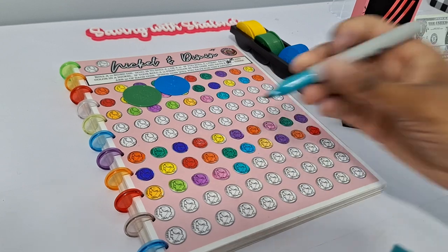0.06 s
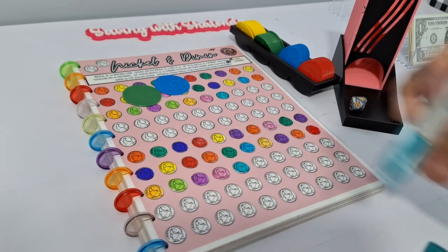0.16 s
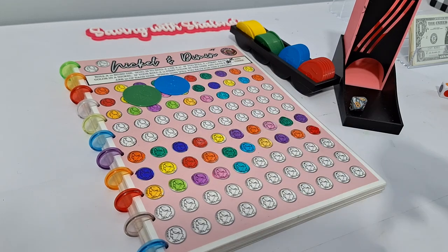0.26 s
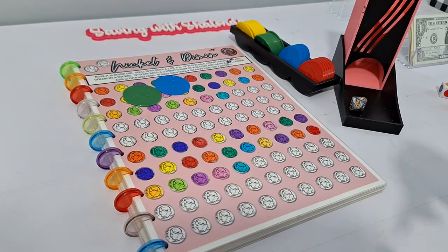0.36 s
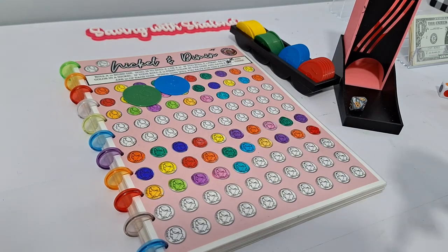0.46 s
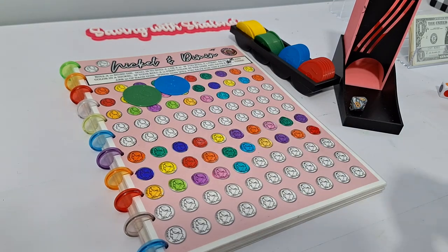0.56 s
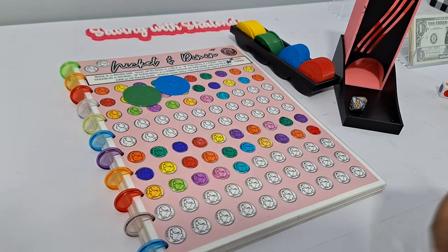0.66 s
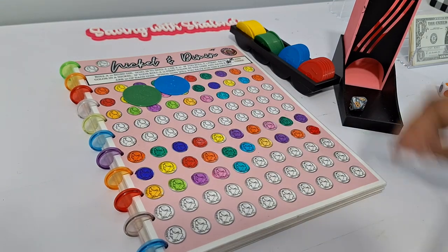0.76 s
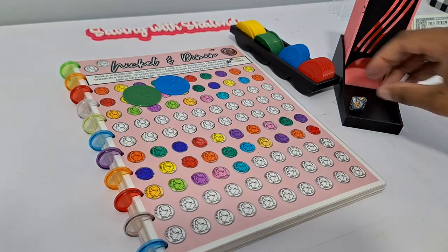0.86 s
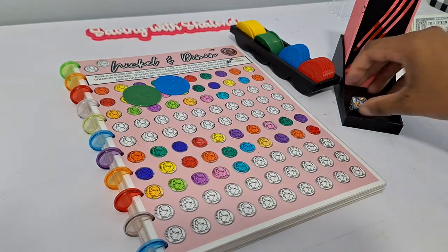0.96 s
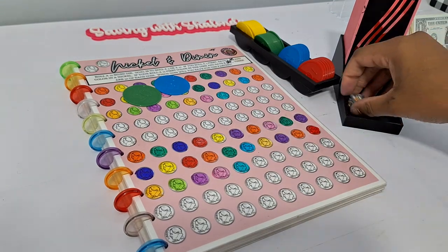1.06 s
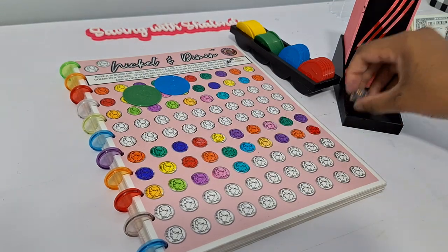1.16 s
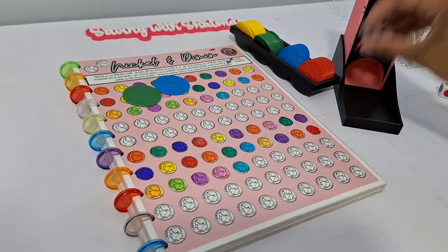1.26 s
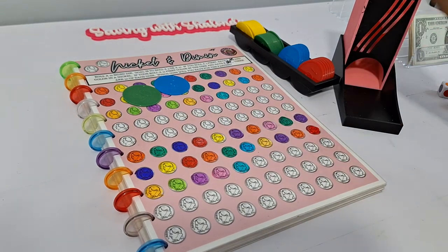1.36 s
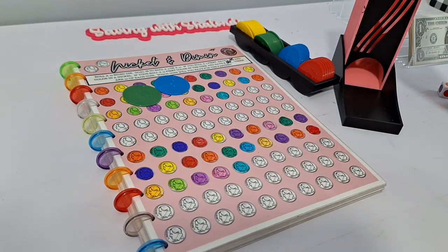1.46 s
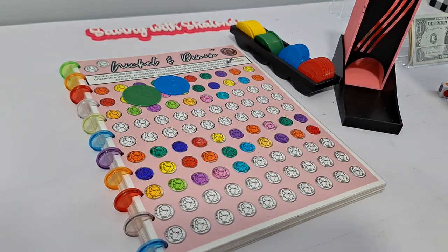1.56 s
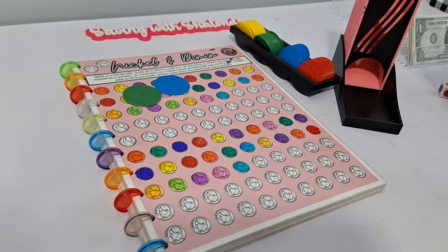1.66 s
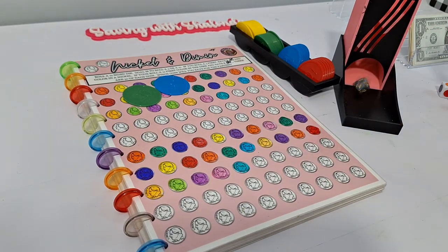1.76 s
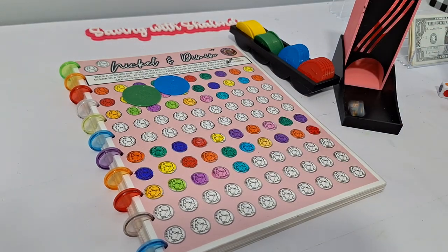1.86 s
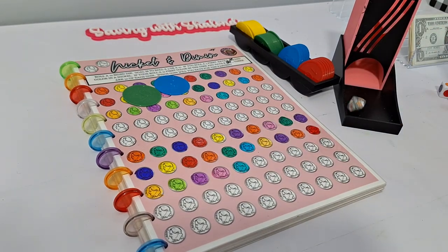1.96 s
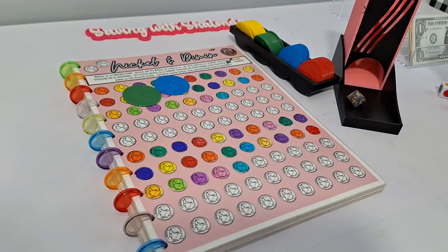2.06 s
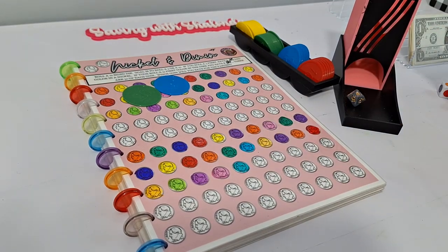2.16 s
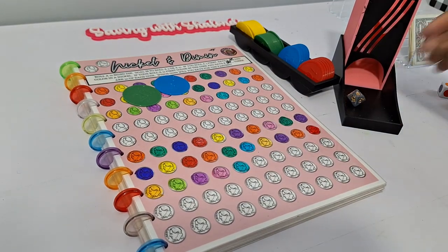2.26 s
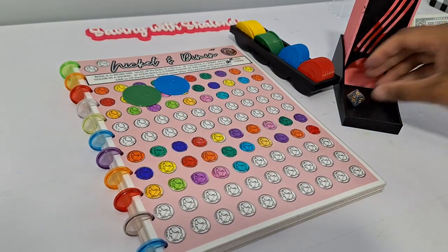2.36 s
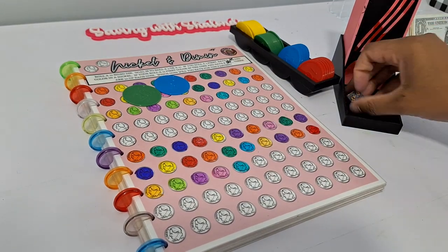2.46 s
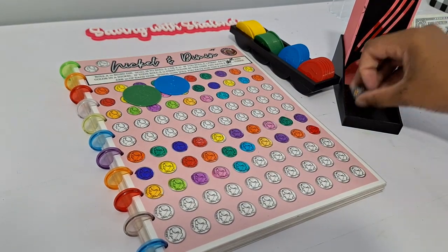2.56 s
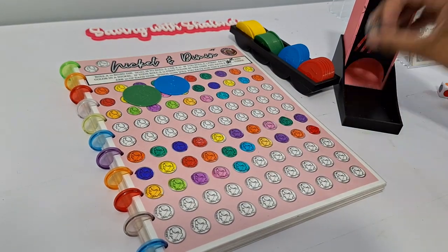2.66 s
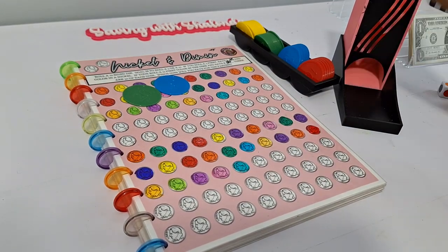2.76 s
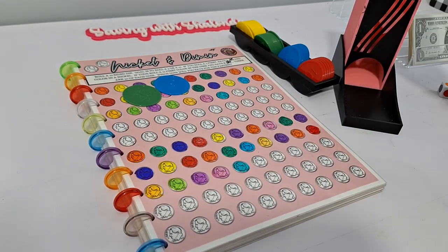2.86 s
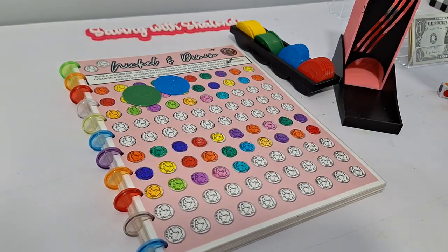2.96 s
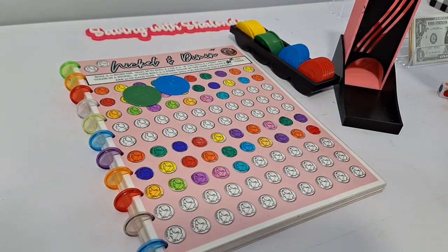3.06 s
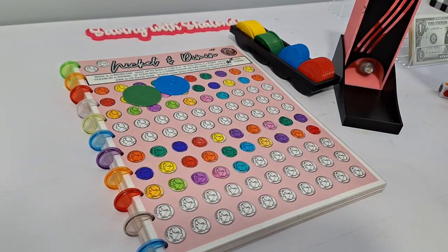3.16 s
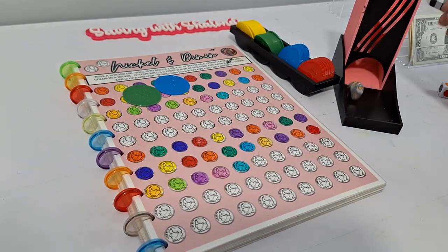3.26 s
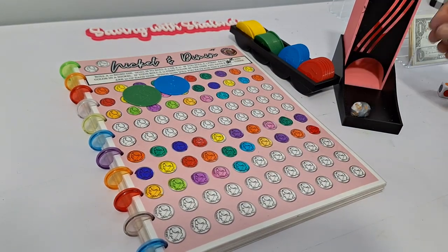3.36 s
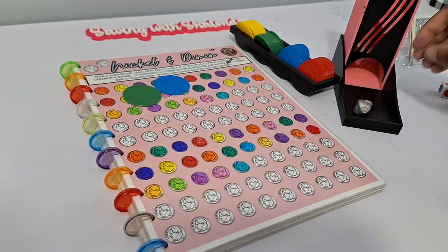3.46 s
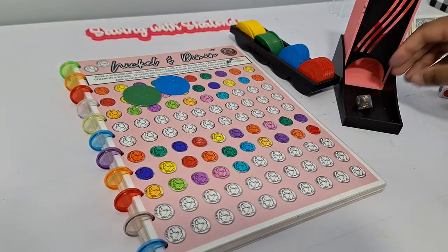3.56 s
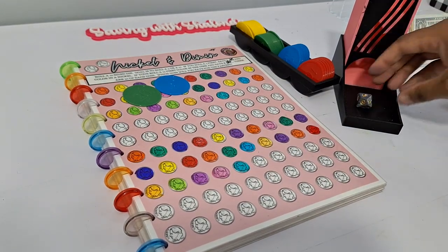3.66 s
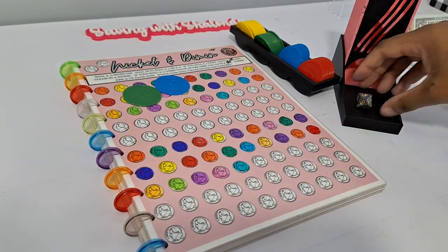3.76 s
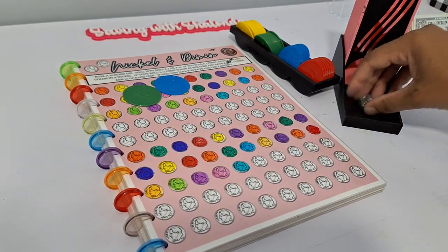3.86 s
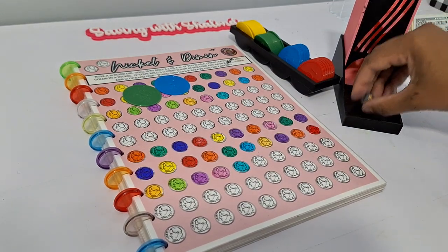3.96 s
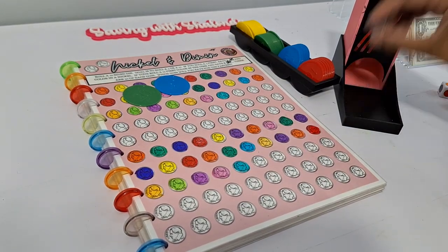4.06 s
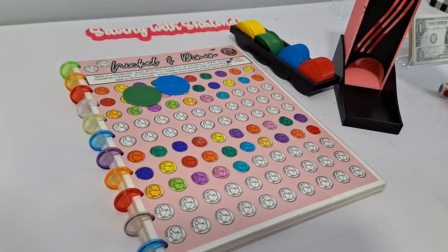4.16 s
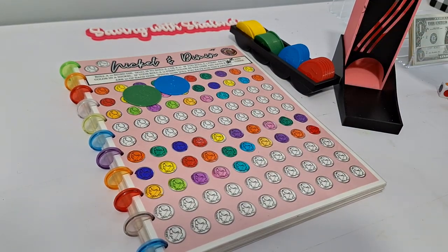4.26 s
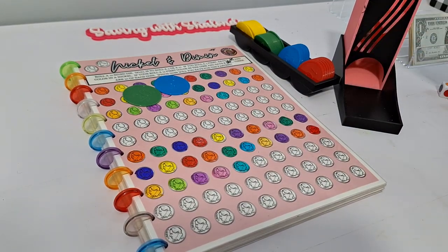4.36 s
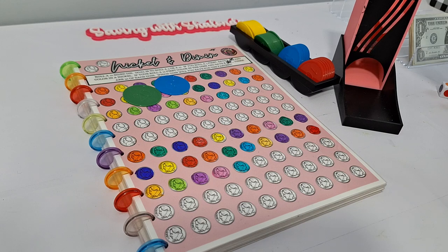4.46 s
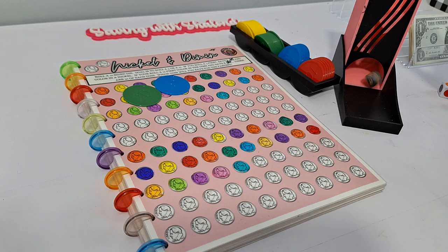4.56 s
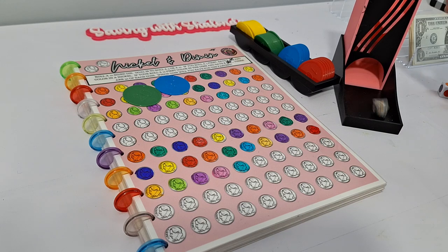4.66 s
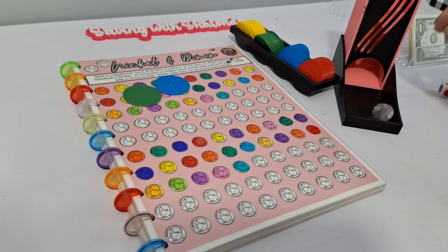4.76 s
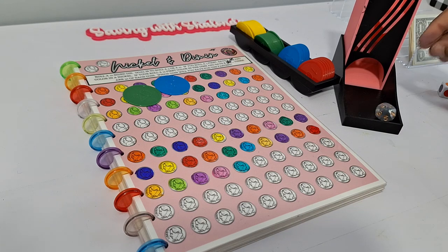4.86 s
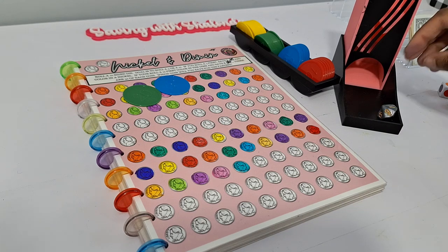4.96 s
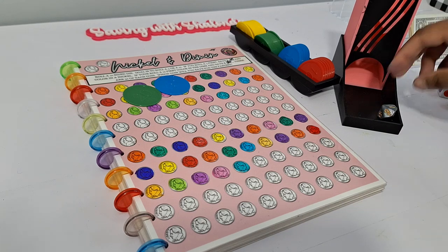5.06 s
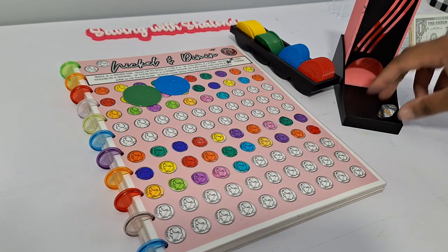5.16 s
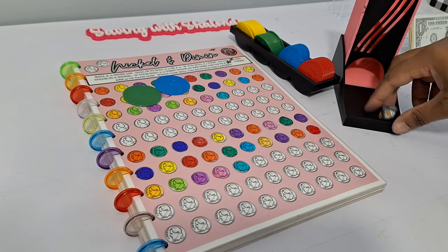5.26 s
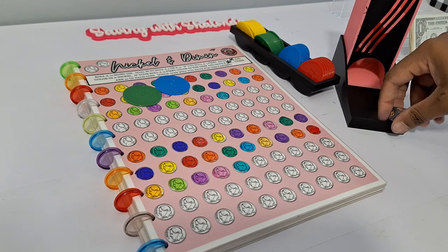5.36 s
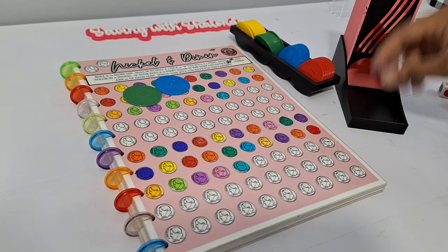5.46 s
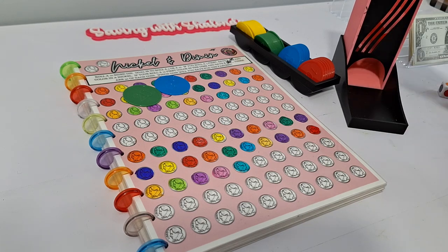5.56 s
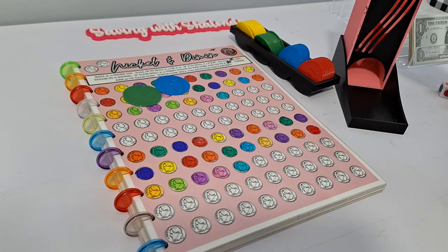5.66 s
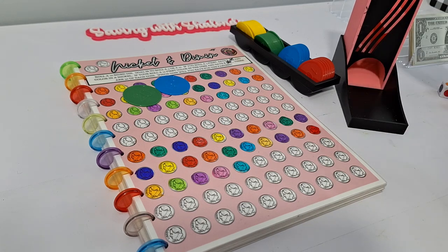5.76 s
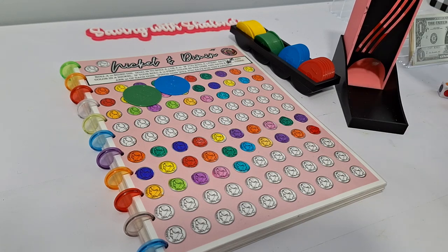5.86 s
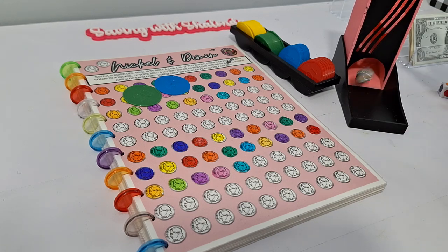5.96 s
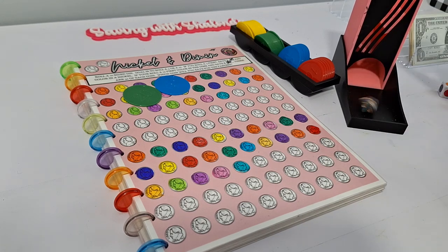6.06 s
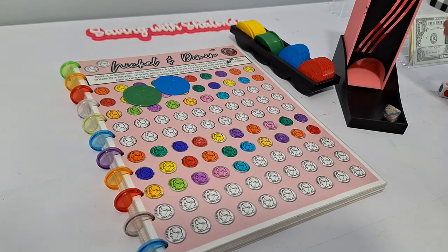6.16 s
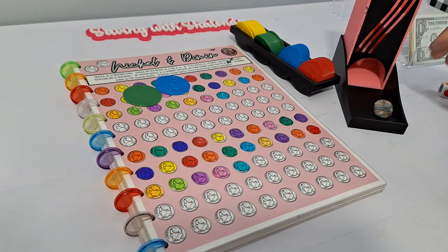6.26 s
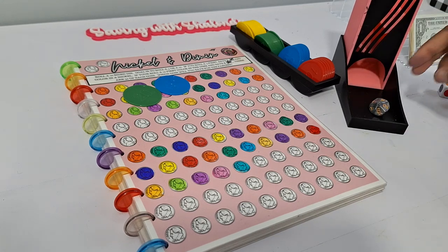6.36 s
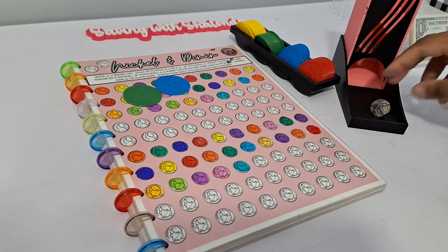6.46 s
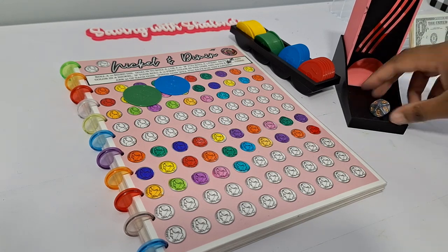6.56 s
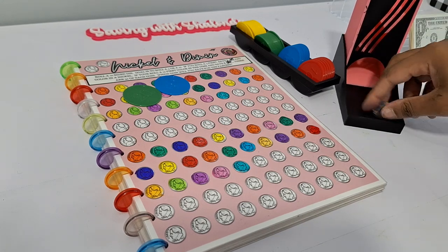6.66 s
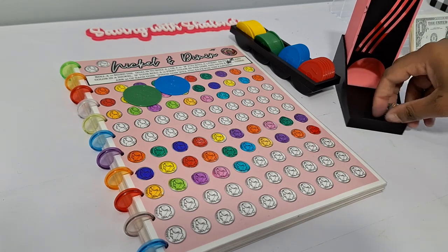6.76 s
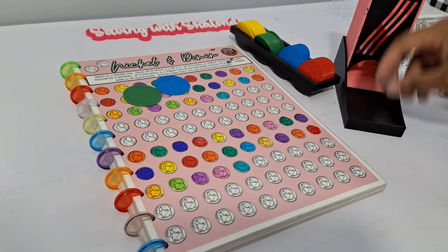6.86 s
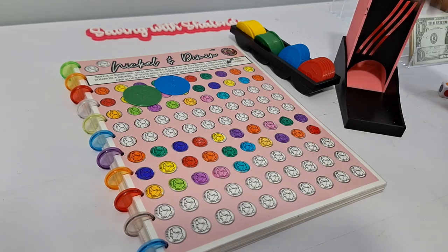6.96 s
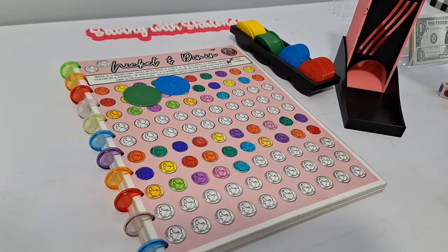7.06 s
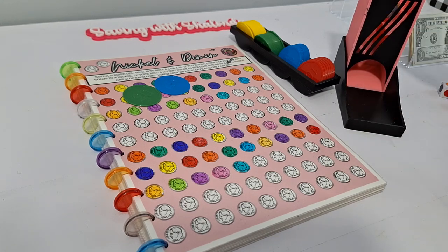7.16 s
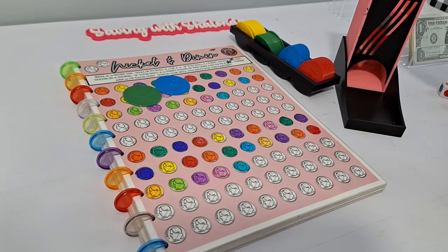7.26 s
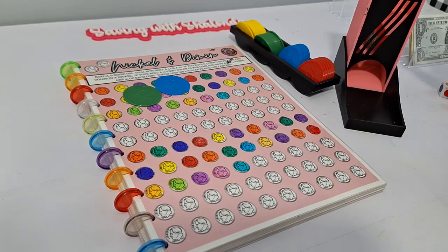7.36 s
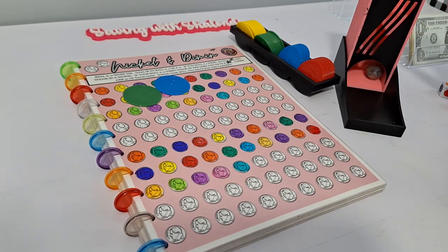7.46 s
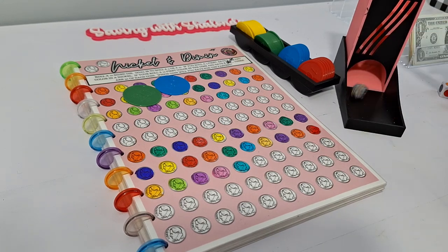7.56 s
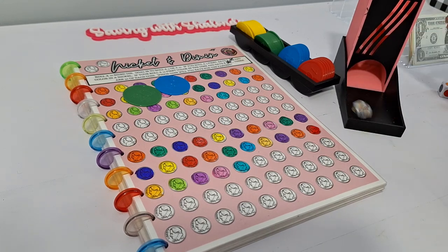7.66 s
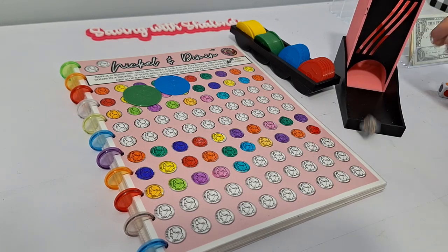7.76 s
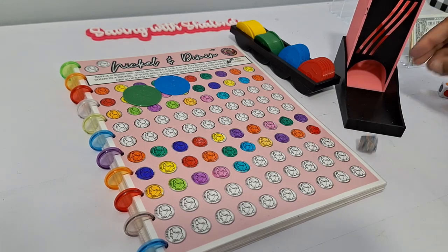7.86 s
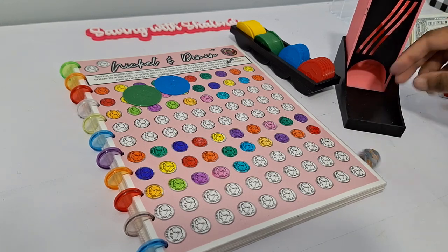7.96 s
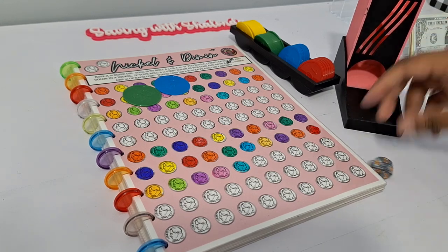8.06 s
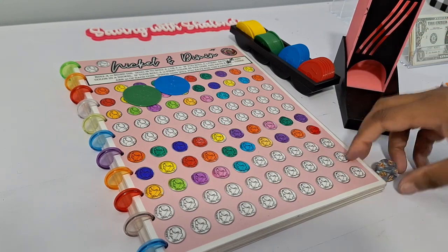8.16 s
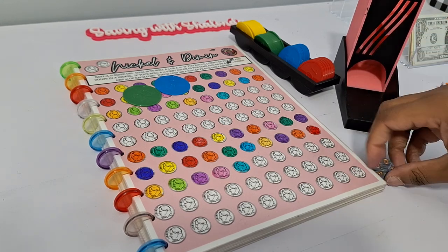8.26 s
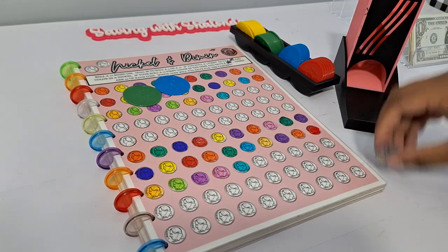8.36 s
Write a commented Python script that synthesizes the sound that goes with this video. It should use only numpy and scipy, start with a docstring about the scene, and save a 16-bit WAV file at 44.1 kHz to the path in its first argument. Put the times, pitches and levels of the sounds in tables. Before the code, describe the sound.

In a small room with a faint low hum, a die clatters through a plastic tower five times, about once every second and a half. Light finger rubs and pen cap clicks come first. Each throw is a quick run of sharp, ringing plastic knocks with soft table thuds, and the die rocks to rest in the tray, except on the last, when it bounces onto the tabletop. Everything is heard nearby, a little to the right.

```python
"""First you hear a low room rumble, fingers sliding softly and a cap clicking onto a pen.
Then a die drops five times through a plastic dice tower on a table in a small room. It rattles between
the baffles (the shelves inside), hits the exit ramp and tumbles in the tray, where fingers pick it up.
On the last throw it jumps the rim and bounces on the table. Each hit is a short crack that makes the
part ring and the table thud, and the walls echo it."""
import sys
import numpy as np
from scipy import signal
from scipy.fft import rfft, irfft
from scipy.io import wavfile
from scipy.ndimage import uniform_filter1d

SR = 44100
rng = np.random.default_rng(int(sys.argv[2]) if len(sys.argv) > 2 else 0)


def transcribe(signal):
    """Save signal, clipped to [-1, 1], as a 16-bit WAV file at the path in sys.argv[1]."""
    frames = np.atleast_2d(signal).T
    limited = np.clip(frames, -1, 1)
    pcm = np.round(limited * 32767).astype(np.int16)
    wavfile.write(sys.argv[1], SR, pcm)


N = 370440

# Levels are relative. A fade_s is the time a sound takes to die away by 60 dB.
# The rumble's tone, and the hum inside it: pitch_hz, level_db
RUMBLE_TONE = [(12, -57.5), (20, -37), (46, -10), (65, 0.5), (86, -13), (146, -4), (187, -16), (262, -11),
               (357, -23), (388, -23), (590, -35.5), (678, -38), (1600, -47.5), (5850, -58), (12100, -56),
               (16000, -56.5)]
HUM = (55, -60)
# How the rumble rises and falls: time_s, level_db
RUMBLE_LEVELS = [(0, -49), (1.2, -49.5), (2.25, -54.5), (2.8, -55.5), (3.8, -51), (4.2, -54.5),
                 (8.1, -53.5), (8.24, -45.5), (8.4, -53.5)]
# Finger strokes: middle_s, length_s, level_db, brightness_db_per_octave
STROKES = [(0.128, 0.21, -54, -0.5), (0.255, 0.19, -64, 0), (0.678, 0.067, -43, 13),
           (1.1, 0.047, -49.5, -5.5), (1.331, 0.011, -68.5, 0.5), (2.531, 0.086, -61, -2),
           (3.787, 0.27, -66.5, -6), (3.931, 0.048, -48, -5), (5.248, 0.064, -64.5, -3.5),
           (5.338, 0.035, -50, -3.5), (6.645, 0.062, -56.5, -3), (6.683, 0.055, -46.5, -8.5),
           (6.851, 0.084, -57.5, -6.5), (8.246, 0.12, -59, -4.5)]
# Hits on each part. Brightness tilts the treble; body lifts the lower tones.
# start_s, strength_db, brightness_db_per_octave, body_db, favoured_pitch_hz
PEN_HITS = [(0.4281, -28, -2, -1, 1750), (0.5797, -17.5, -1, 0, 1710), (0.6068, -17, 1.5, -4, 2400),
            (0.6331, -5.5, 0.5, 4.5, 2340), (0.7011, -15.5, 1.5, -2, 4900)]
PICKUP_HITS = [(1.0744, -29.5, 1, 6, 1120), (1.1053, -1, 0, -7.5, 3940), (3.9429, 0, 0, -5.5, 2570),
               (3.9504, -4, 0.2, -7.5, 2540), (5.3442, -0.5, 8, 10, 4520), (5.3515, -1, 6, 10.5, 4700),
               (6.7078, -8.5, 2.2, -1.5, 2080), (6.7257, -8.5, -1.5, -0.5, 2450),
               (6.7921, -23, 4.5, 8, 770)]
BAFFLE_HITS = [(1.559, 12.5, 3, -6, 1900), (1.5705, 19, 0.5, 5, 1660), (1.6239, 14, 0.4, -4, 3740),
               (1.6331, 12.5, 4, 3.5, 2670), (1.6755, 10.5, -4, 3, 1820), (2.9236, 7.5, -2, -6.5, 2890),
               (2.9275, 13.5, 0.5, 4.5, 1227), (2.9512, 19.5, 1, -1.5, 950), (2.9822, 11, -1.5, 6, 5200),
               (3.003, 14, -1, 1.5, 3740), (3.0277, 10, 0, 2, 1710), (3.0728, 12.5, -1.5, -0.5, 1020),
               (4.3202, 5.5, 1.5, -3, 3800), (4.3318, 13, 2.8, -1, 4280), (4.3382, 17.5, -3, 3.5, 3780),
               (4.3468, 16, 1, 6.5, 1700), (4.3617, 5.5, 0.5, 1.5, 4950), (4.4165, 14, 1.7, 2, 3910),
               (4.4225, 14.5, -1.5, -8.5, 5000), (4.4471, 9, -2, 8, 970), (4.4599, 7.5, 1, 4, 1000),
               (4.473, 12.5, -3.5, -3.5, 1170), (5.7927, -0.5, 4.5, 3, 4240), (5.7944, 14.5, 1, 6, 4330),
               (5.8039, 17, -0.8, -6.5, 1190), (5.8187, 10.5, 2.5, -2.5, 3500),
               (5.8432, 12.5, 0, -2.5, 1200), (5.8553, 16, -1.4, -3, 3780), (5.9012, 15.5, 1, 2.5, 5290),
               (7.1896, 1.5, 2, -6.5, 5150), (7.1928, 10, 0, 0, 1820), (7.2064, 14.5, 2.5, 4, 4400),
               (7.2185, 15.5, 0, 1.5, 1800), (7.2443, 13.5, 0.5, 7, 990), (7.279, 4.5, 3, 1, 1350),
               (7.293, 12, 0, 2.5, 1670), (7.3644, 17, -0.5, 2.5, 2760), (7.423, 13, -4, 1, 5070)]
RAMP_HITS = [(1.6911, 17.5, 0.5, -4.5, 2890), (1.7224, 19.5, -0.5, -0.5, 2230), (1.7353, 11, -5.5, 1, 1890),
             (1.7636, 19, -1.5, -3.5, 2650), (1.7673, 17.5, -1.5, -12.5, 2900), (3.1085, 19, 1.9, -9, 2720),
             (3.1144, 11.5, 3, 8, 3710), (3.1391, 9.5, 0, 6.5, 1510), (3.179, 21, 0.5, 1, 1028),
             (3.211, 18.5, 0.7, -1, 2945), (3.2195, 11.5, -7.5, -10, 2880), (4.5378, 14.5, -0.5, 7.5, 957),
             (4.5585, 17, 1, 3.5, 2790), (4.6123, 13.5, 2.5, 6.5, 2740), (5.95, 19, 0, -1, 2820),
             (7.4729, 15, 0.5, 7.5, 1004), (7.5147, 19.5, -.3, 0.5, 4000)]
# Hits after the die leaves the ramp: start_s, strength_db, brightness_db_per_octave, body_db
TRAY_HITS = [(1.8271, 12, 1.5, 0.5), (1.8902, 5, 7, 4), (1.8959, 15.5, -2, -13), (1.9312, 7, 6, 7.5),
             (1.9869, -2.5, 1, 6.5), (2.0121, 10.5, 1.5, -6.5), (2.0529, 2, 2, -8), (3.3088, 15, 4, -2.5),
             (3.3532, 8, 1.5, -2), (3.3843, 7, 2, -1), (3.3983, 1, 3, 0), (3.4201, 4, 5, -3),
             (3.4614, 1, 3.5, 5), (3.4847, 1, 1, 5), (3.5056, 7.5, 2.5, 1), (3.5306, 8, 1, -7),
             (4.676, 12, 3.5, 0.5), (4.732, 12, 3, -0.5), (4.7541, 8.5, 8.5, -16), (4.7702, 9, -0.5, 4.5),
             (4.8313, 13, 2, 1), (4.86, 6.5, 3.5, 0.5), (4.8957, 1, 4.5, 3.5), (4.9203, -9, -1, 3),
             (6.0575, 11, 4, 1.5), (6.0766, 9.5, 8, 2.5), (6.1145, 14, 4, -12.5), (6.1537, 3, 0, 1.5),
             (6.1685, 3.5, 5.5, 5.5), (6.2053, -1, -2, 4.5), (6.2345, 8.5, 4, -5), (6.2833, 5, 1.5, -7),
             (6.4538, -17, -9, -2), (7.6175, 9.5, 5, 1.5), (7.6329, 9.5, -1, -21), (7.6616, 8, 3, 0.5),
             (7.7165, 10, 3.5, 7.5), (7.7354, 5.5, 2.5, 2.5), (7.7869, -11, -13, 9)]
TABLE_HITS = [(7.8382, 14, -3.5, -4.5), (7.8965, -1, -6, 1.5), (7.9671, 5.5, 0, -5.5), (8.0213, -9.5, 6, 3),
              (8.0468, 3, 4.5, -6), (8.1164, -4.5, -2.5, -5.5), (8.251, -28, 4.5, 11.5),
              (8.288, -20.5, 10, -0.5)]
# The die rocking to rest: start_s, strength_db, first_gap_s
ROCKINGS = [(2.0678, 7, 0.024), (3.5569, 7, 0.056), (4.9718, -7.5, 0.023), (6.308, 2, 0.029)]
# The usual tone of a rub, and of a knock on each part: pitch_hz, level_db
RUB_TONE = [(100, -7.5), (600, 3), (1300, 2.5), (2600, 1), (7000, 2.5), (15000, -6.5)]
PEN_TONE = [(60, -16), (600, -11), (1100, -9), (1900, -6.5), (2700, -13), (4300, -6), (7500, -2.5),
            (15000, -21)]
BAFFLE_TONE = [(60, -17), (300, -13.5), (600, -8), (850, -4), (1100, 1.5), (1400, -1.5), (1900, 1),
               (2700, -3), (3400, 0.5), (4300, 0.5), (5800, -5), (7500, -4.5), (9000, -12.5),
               (15000, -16.5)]
RAMP_TONE = [(60, -36), (300, -30), (600, -8.5), (850, -12.5), (1100, -4), (1400, -6.5), (1900, -2.5),
             (2700, 1), (3400, -5.5), (4300, -3.5), (5800, -9), (7500, -11), (9000, -18), (15000, -23.5)]
TRAY_TONE = [(60, -26.5), (300, -1.5), (600, -1), (850, -3), (1100, 0), (1400, 1), (1900, 0), (2700, 3),
             (3400, -2), (4300, 1), (5800, -9.5), (7500, -8.5), (9000, -19), (15000, -25.5)]
TABLE_TONE = [(60, -42.5), (300, 0.5), (600, 11.5), (850, 10), (1100, 4.5), (1400, 10.5), (1900, 4),
              (2700, 1), (3400, -2.5), (4300, -13.5), (5800, -20.5), (7500, -24), (9000, -37), (15000, -39)]
# The notes that ring on after a rub or knock: pitch_hz, fade_s, level_db
RUB_NOTES = [(1160, 0.065, 4), (1338, .03, -5.5), (2330, .015, -1), (4280, .015, -3.5)]
PEN_NOTES = [(1750, 0.095, 1), (2530, 0.017, 7)]
BAFFLE_NOTES = [(375, 0.056, 7.5), (610, 0.052, 9.5), (980, 0.8, -1), (1000, 0.12, 5), (1177, .06, -3.5),
                (1565, 0.037, 0), (1766, .065, 5), (1826, 0.066, 8.5), (1910, 0.14, 4.5), (2170, 0.28, -1),
                (2670, 0.084, 12.5), (2850, 0.059, 12.5), (3540, 0.064, 3), (3920, 0.015, -2.5),
                (4310, 0.024, 6), (5000, 0.018, 4), (6120, 0.17, -4.5)]
RAMP_NOTES = [(352, 0.093, 21), (614, .06, 5), (989, 0.094, 5.7), (1820, .1, 3), (1916, 0.36, 12),
              (2210, 0.13, 0.89), (2590, 0.39, 1.7), (2450, 0.42, 1.5), (2480, 0.077, 4.4),
              (2692, 0.052, 3.4), (2830, 0.075, 3.5), (2825, 0.071, 3.3), (3090, 0.085, 2),
              (3763, 0.032, 1.1), (4350, 0.033, 3.4), (5200, 0.035, 2.4)]
TRAY_NOTES = [(590, 0.053, -0.5), (1110, 0.043, 6.5), (1170, 0.038, 0), (1260, 0.056, 0.5),
              (1349, 0.073, 4), (2049, 0.1, 5.5), (2450, 0.072, 3), (2650, .06, -10.5), (3100, .05, -9.5),
              (4340, 0.12, -9), (6530, 0.11, -2)]
TABLE_NOTES = [(580, 0.081, -11), (1130, 0.051, 6), (1300, 0.089, -3), (1567, 0.051, 1.5), (2240, 0.032, 2)]
THUD_NOTES = [(130.4, 1, -55), (135.3, 0.24, -43.5), (200.5, 0.27, -50), (286, 0.14, -64.5),
              (363, 0.3, -55)]
# How long the room echoes: pitch_hz, fade_s
ECHO_FADES = [(150, 0.79), (400, 0.27), (1000, 0.25), (2800, 0.22), (7000, 0.23), (15000, 0.2)]
# The echo's tone: pitch_hz, level_db
ECHO_TONE = [(150, 4), (500, 0.5), (1000, 4.5), (2800, 2.5), (7000, 1), (15000, -1.5)]
# How alike left and right are, for room sound and for direct sound: pitch_hz, likeness_0_to_1
ROOM_LIKENESS = [(100, 0.6), (250, 1), (600, 0.2), (1200, 0), (2500, 0)]
DIRECT_LIKENESS = [(250, 0.78), (550, 1), (1000, 0.33), (3000, 0.64), (8000, 0.36), (15000, .45)]
# The balance of sound from the right, where the tower stands: pitch_hz, left_minus_right_db
BALANCE = [(200, -0.5), (550, -0.5), (1000, 0.5), (2200, -2.5), (4200, -3), (8000, -4), (12000, -9.5)]
# What 1 dB of body does to a knock's tone: pitch_hz, change_db
BODY_SHAPE = [(100, 0.73), (450, 0.53), (800, 1), (1200, 1.01), (1500, 1), (1900, 0.34), (2500, -0.13),
              (3500, 0), (6000, 0.14), (9000, 0)]

KNOCK_SAMPLES = 2048
KNOCK_HZ = np.fft.rfftfreq(KNOCK_SAMPLES, 1 / SR)


def gain_of(db):
    """Turns decibels into a number to multiply a sound by."""
    return 10 ** (np.asarray(db) / 20)


def evened(x):
    """Scales a sound to an average power of one."""
    return x / np.sqrt(np.mean(x ** 2) + 1e-20)


def look_up(table, hz):
    """Reads a table at any pitch, sliding smoothly between its rows."""
    pitches, values = np.transpose(table)
    return np.interp(np.log(hz + 1), np.log(pitches + 1), values)


def add(mix, start_s, sound):
    """Mixes a sound in at the given time."""
    part = mix[..., max(round(start_s * SR), 0):][..., :sound.shape[-1]]
    part += sound[..., :part.shape[-1]]


def fade(t, fade_s):
    """A curve that drops by 60 dB every fade_s."""
    return np.exp(-np.log(1000) * t / np.maximum(fade_s, 1e-3))


def tone_filter(gain):
    """Makes a filter that shapes the tone but lets nothing sound before the hit (minimum phase)."""
    log_gain = np.log(np.maximum(gain, 1e-6))
    mirrored = np.concatenate([log_gain, log_gain[..., -2:0:-1]], -1)
    return np.exp(signal.hilbert(mirrored).conj())[..., :gain.shape[-1]]


def stereo(spectra, likeness, hz):
    """Blends two unrelated sounds into a left and a right that are partly alike."""
    same = np.clip(look_up(likeness, hz), 0, 1)
    return np.array([same * spectra[1] + np.sqrt(1 - same ** 2) * spectra[0], spectra[1]])


def from_right(hz, lag_s=0.0001):
    """Sound from the right reaches the left side later and duller."""
    half_db = look_up(BALANCE, hz) / 2
    return np.array([gain_of(half_db) * np.exp(-2j * np.pi * hz * lag_s), gain_of(-half_db)])


def convolve(x, response):
    """Lets every sample of x set off a copy of the response."""
    return signal.oaconvolve(np.atleast_2d(x), np.atleast_2d(response), axes=1)[:, :N]


def rumble(waver=0.22):
    """The building makes a low noise with a wavering hum."""
    hz, t = np.fft.rfftfreq(N, 1 / SR), np.arange(N) / SR
    spectra = stereo(rfft(rng.standard_normal((2, N))), ROOM_LIKENESS, hz)
    noise = evened(irfft(spectra * gain_of(look_up(RUMBLE_TONE, hz)), N))
    noise *= gain_of(np.interp(t, *np.transpose(RUMBLE_LEVELS)))
    turns_s = np.linspace(0, t[-1], 40)
    swell, drift = (np.interp(t, turns_s, rng.standard_normal(len(turns_s))) for _ in range(2))
    hum_hz, hum_db = HUM
    hum = np.sqrt(2) * (1 + waver * swell) * np.sin(2 * np.pi * hum_hz * t + waver * drift)
    return (noise + gain_of(hum_db) * hum) * gain_of([[.7], [-.7]])


def finger_rubs(echo_db=-5, roughness_db=4):
    """Skin slides over paper and plastic in tiny uneven slips, which make the tray ring."""
    out = np.zeros((2, N))
    hz = np.fft.rfftfreq(SR // 2, 1 / SR)
    for middle_s, length_s, db, bright_db in STROKES:
        slips = rng.standard_normal((2, SR // 2)) * gain_of(roughness_db * rng.standard_normal(SR // 2))
        tone = gain_of(look_up(RUB_TONE, hz) + bright_db * np.log2(np.maximum(hz, 600) / 2000))
        hiss = evened(irfft(stereo(rfft(slips), DIRECT_LIKENESS, hz) * tone * from_right(hz)))
        swell = np.hanning(int(length_s * SR))
        add(out, middle_s - length_s / 2, gain_of(db) * hiss[:, :len(swell)] * swell)
    out = convolve(out, ringing(RUB_NOTES))
    return out + gain_of(echo_db) * room_echo(out[1])


def ringing(notes):
    """A touched spot passes on the touch and rings, each note a little off in level and pitch."""
    t = np.arange(SR // 4) / SR
    response = np.where(t == 0, 1., 0.)
    chance = rng.uniform(-1, 1, (len(notes), 2)) * [3, .005]
    for (hz, fade_s, db), (luck_db, detune) in zip(notes, chance):
        height = gain_of(db + luck_db) * 2 * np.log(1000) / (fade_s * SR)
        response += height * fade(t, fade_s) * np.cos(2 * np.pi * hz * (1 + detune) * t)
    return response


def room_echo(x, gap_s=.004, build_s=0.0013, early_height=1.7):
    """The walls send back many small echoes; the low ones last longest."""
    slots = np.arange(0, SR // 2, 12)  # one echo somewhere in every 12 samples
    echoes = np.zeros((2, SR // 2 + 12))
    arrivals = slots + rng.integers(0, 12, (2, len(slots)))
    np.put_along_axis(echoes, arrivals, rng.choice([-1., 1.], arrivals.shape), 1)
    early = rng.integers(round(.006 * SR), round(.035 * SR), 6)  # from things close by
    echoes[:, early] += early_height * rng.choice([-1., 1.], len(early))
    hz, t, spectra = signal.stft(echoes, SR, nperseg=256)
    hz = hz[:, None]
    spectra = stereo(spectra, ROOM_LIKENESS, hz) * fade(t, look_up(ECHO_FADES, hz))
    tail = signal.istft(spectra * gain_of(look_up(ECHO_TONE, hz)), SR)[1]
    tail *= np.clip((np.arange(tail.shape[1]) / SR - gap_s) / build_s, 0, 1)
    return convolve(x, tail / np.linalg.norm(tail[1]))


def knock(tone_db, fade_s, crack=0.86, crack_s=0.0043, rise_s=.0007):
    """Two hard things meet: a crack and a crowd of short vibrations, made from fresh noise each time."""
    t = np.arange(KNOCK_SAMPLES) / SR
    spreading = 1 - np.exp(-t / rise_s)  # the shaking needs a moment to fill the part
    burst = rng.standard_normal((2, len(t))) * spreading * (fade(t, fade_s) + crack * fade(t, crack_s))
    spectra = stereo(rfft(burst), DIRECT_LIKENESS, KNOCK_HZ)
    noise_tone = np.sqrt(uniform_filter1d(abs(spectra) ** 2, size=41, axis=1))
    return irfft(spectra * tone_filter(gain_of(tone_db) / noise_tone) * from_right(KNOCK_HZ))


def struck(hits, tone, notes, level_db, echo_db, base_fade_s, spot_db, spot_width=0.019, spot_count=5):
    """Plays the hits on one part, taking turns among spots that each ring and echo in their own way."""
    spots = np.zeros((spot_count, 2, N))
    treble_octaves = np.log2(np.maximum(KNOCK_HZ / 2710, 1))
    for k, (start_s, db, bright_db, body_db, *pitch) in enumerate(hits):
        # Each hit favours one pitch: its own if it lists one, or else a random note of the part.
        spot_hz = pitch[0] if pitch else notes[rng.integers(len(notes))][0]
        favoured_db = spot_db / (1 + ((KNOCK_HZ / spot_hz - 1) / spot_width) ** 2)
        colour_db = bright_db * treble_octaves + body_db * look_up(BODY_SHAPE, KNOCK_HZ)
        tone_db = db + look_up(tone, KNOCK_HZ) + colour_db + favoured_db
        # Stronger hits are shorter. So are brighter ones: a corner leaves sooner than a flat side.
        halvings = db / 34.5 + bright_db / 24
        add(spots[k % spot_count], start_s, knock(tone_db, base_fade_s * .5 ** halvings))
    sounds = [convolve(spot, ringing(notes)) for spot in spots]
    echo_gain = gain_of([[echo_db - 2], [echo_db]])  # left, right
    return gain_of(level_db) * sum(x + echo_gain * room_echo(x[1]) for x in sounds)


def pen_cap():
    """The cap clicks as it is pushed onto the pen."""
    return struck(PEN_HITS, PEN_TONE, PEN_NOTES, level_db=-3, echo_db=-8,
                  base_fade_s=.011, spot_db=12, spot_width=.08, spot_count=1)


def pickups():
    """Fingers knock the die against the tray as they pick it up."""
    knocks = struck(PICKUP_HITS, TRAY_TONE, TRAY_NOTES, level_db=-1.46, echo_db=-7.5,
                    base_fade_s=.021, spot_db=5.5, spot_width=.051, spot_count=2)
    return knocks + table_thud(PICKUP_HITS, level_db=-8.5)


def table_thud(hits, level_db):
    """Each hit of the die also pushes the table top, which swings with a low thud."""
    pushes, t = np.zeros(N), np.arange(SR // 3) / SR
    for start_s, db, _, body_db, *_ in hits:
        add(pushes, start_s, gain_of([db + body_db]))
    swing = sum(gain_of(db) * fade(t, fade_s) * np.sin(2 * np.pi * hz * t)
                for hz, fade_s, db in THUD_NOTES)
    return gain_of(level_db) * convolve(pushes, swing)


def baffle_rattle():
    """The falling die bounces between the tower's plastic shelves."""
    knocks = struck(BAFFLE_HITS, BAFFLE_TONE, BAFFLE_NOTES, level_db=-2.5, echo_db=-7.5,
                    base_fade_s=.04, spot_db=8.5)
    return knocks + table_thud(BAFFLE_HITS, level_db=-12.5)


def ramp_clatter():
    """The die lands on the exit ramp and makes it ring."""
    knocks = struck(RAMP_HITS, RAMP_TONE, RAMP_NOTES, level_db=-0.7, echo_db=-7,
                    base_fade_s=.026, spot_db=9.5)
    return knocks + table_thud(RAMP_HITS, level_db=-15.5)


def tray_tumble():
    """The die tumbles in the tray and, on the first four throws, rocks to rest."""
    hits = TRAY_HITS + rocking_hits()
    knocks = struck(hits, TRAY_TONE, TRAY_NOTES, level_db=-1.75, echo_db=-7.5,
                    base_fade_s=.023, spot_db=4)
    return knocks + table_thud(hits, level_db=-9.5)


def rocking_hits(count=3, loss_db=5.5, gap_kept=0.65, bright_db=-0.5, body_db=-7):
    """The die tips from edge to edge, each tap sooner and weaker than the last."""
    return [(start_s + gap_s * np.sum(gap_kept ** np.arange(k)), db - k * loss_db, bright_db, body_db)
            for start_s, db, gap_s in ROCKINGS for k in range(count)]


def table_bounces():
    """The die bounces on the table top and is caught."""
    knocks = struck(TABLE_HITS, TABLE_TONE, TABLE_NOTES, level_db=-2, echo_db=-6,
                    base_fade_s=.019, spot_db=5.5)
    return knocks + table_thud(TABLE_HITS, level_db=-4.5)


def scene():
    """Adds up the die, the pen, the fingers and the rumble."""
    die = baffle_rattle() + ramp_clatter() + tray_tumble() + pickups() + table_bounces()
    return die + pen_cap() + finger_rubs() + rumble()


def record(dry, ceiling=.85, lowest_hz=42, highest_hz=16050):
    """Rounds off the sharpest peaks, then takes away the deepest bass and the highest treble."""
    rounded = ceiling * np.tanh(dry / ceiling)
    lean = signal.sosfilt(signal.butter(4, lowest_hz, "highpass", fs=SR, output="sos"), rounded)
    treble_cut = signal.firwin(255, highest_hz, window=("kaiser", 9), fs=SR)
    return signal.oaconvolve(lean, treble_cut[None], "same")


dry = scene()
out = record(dry)
transcribe(out)
```